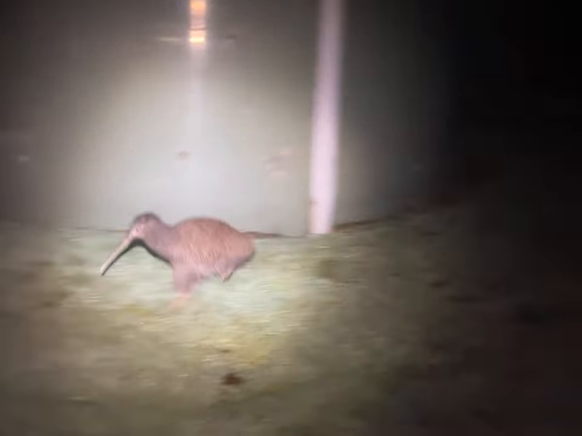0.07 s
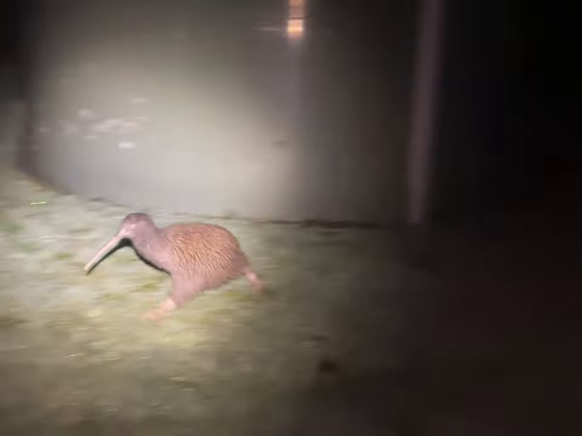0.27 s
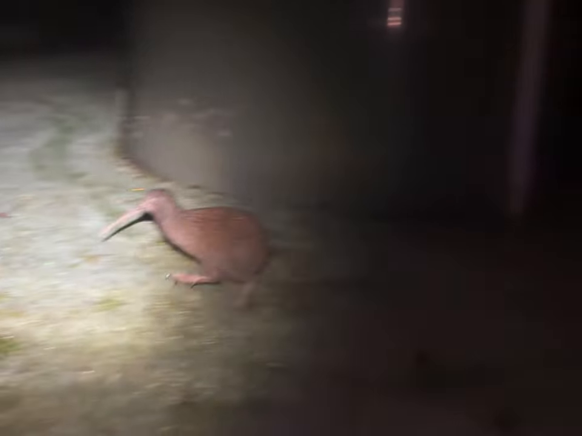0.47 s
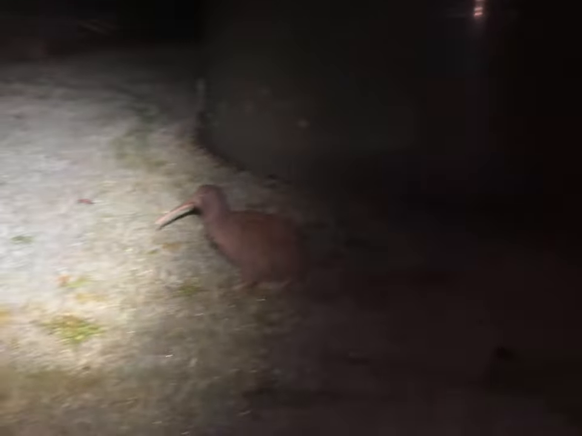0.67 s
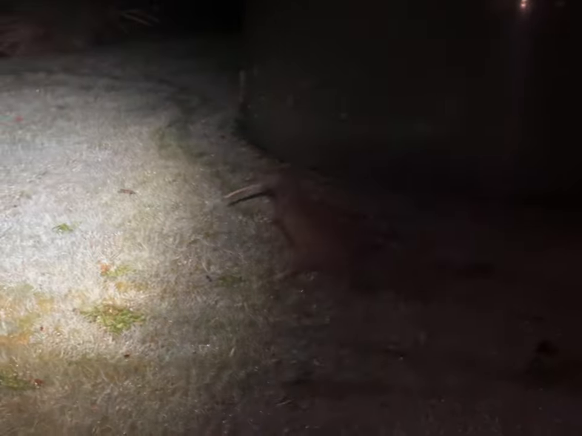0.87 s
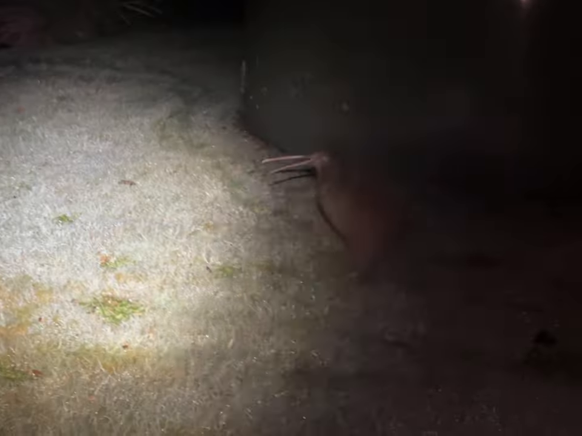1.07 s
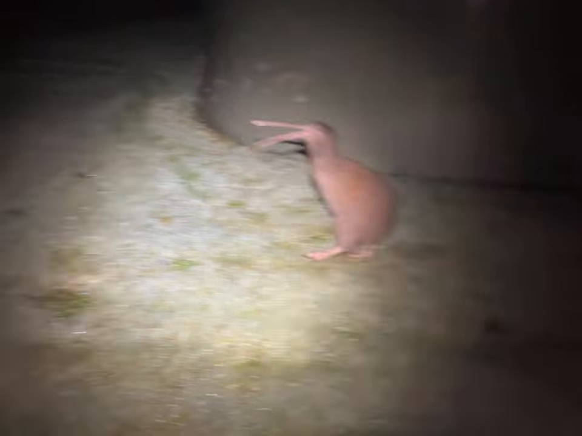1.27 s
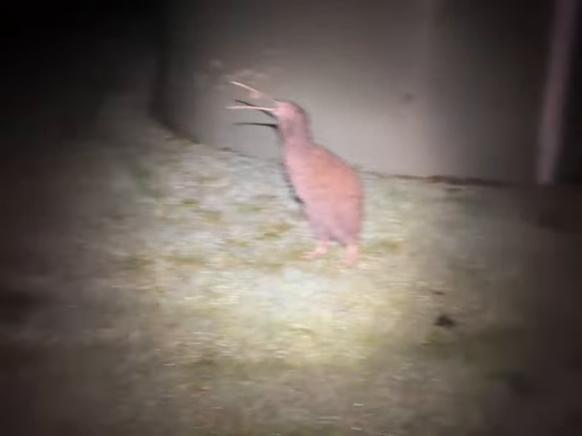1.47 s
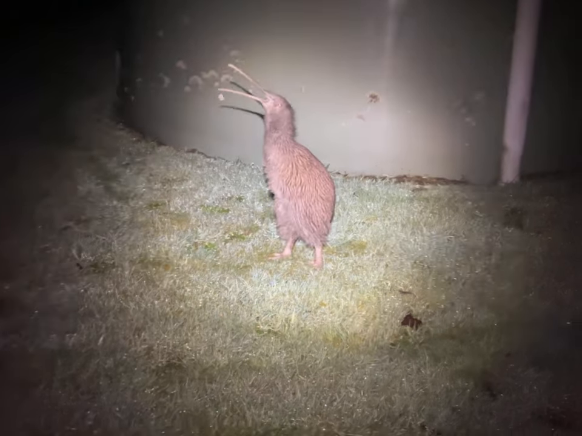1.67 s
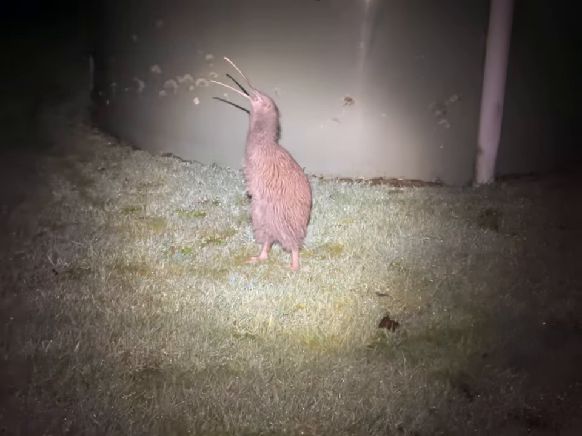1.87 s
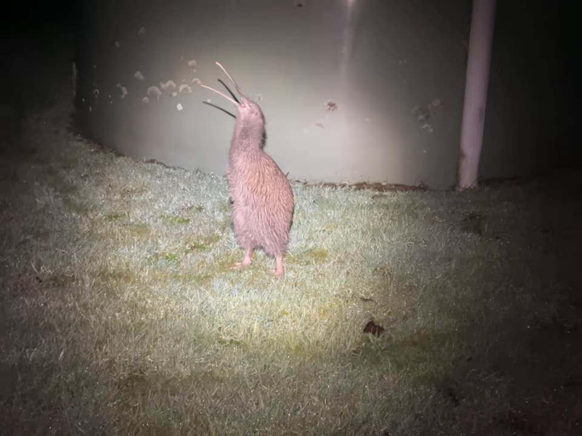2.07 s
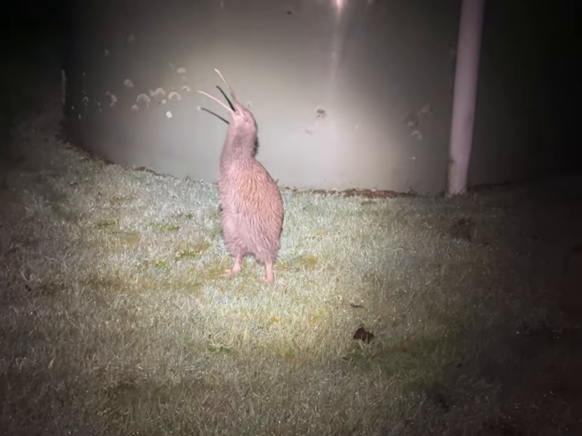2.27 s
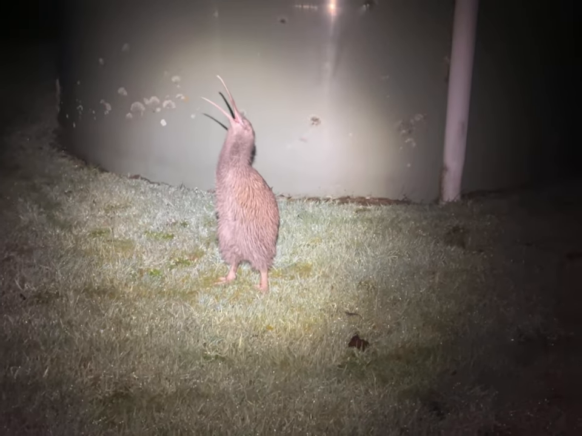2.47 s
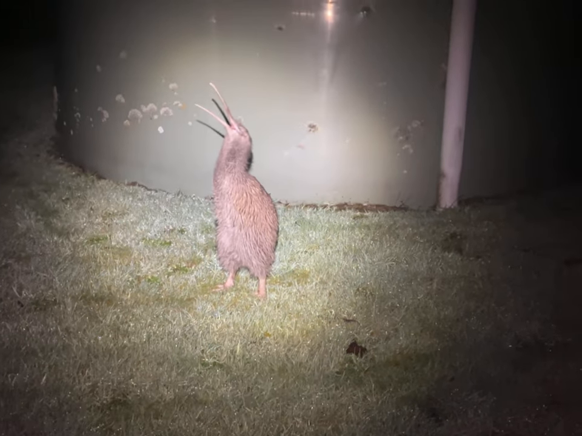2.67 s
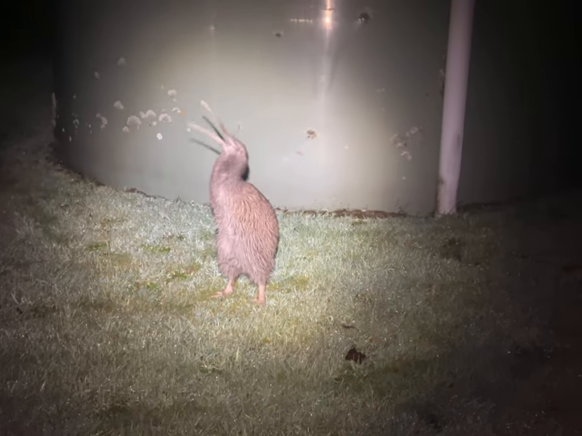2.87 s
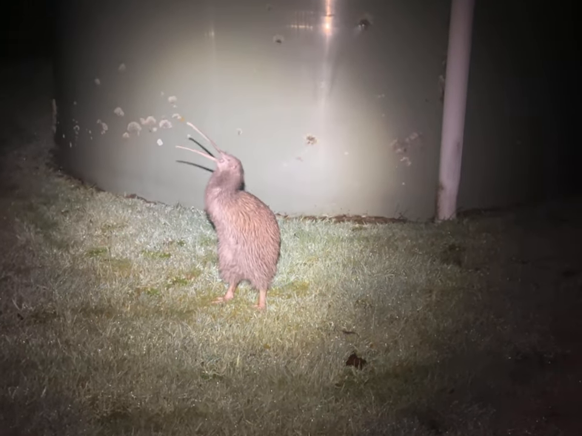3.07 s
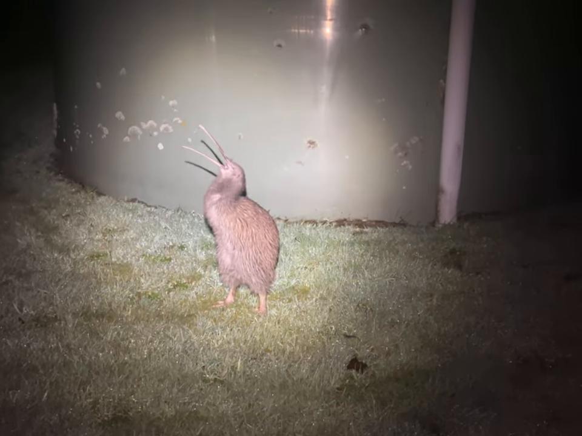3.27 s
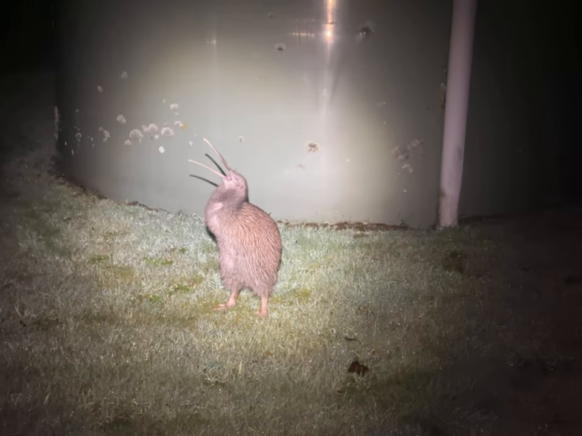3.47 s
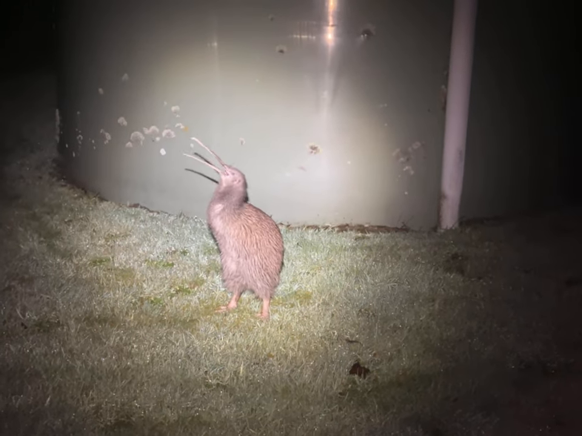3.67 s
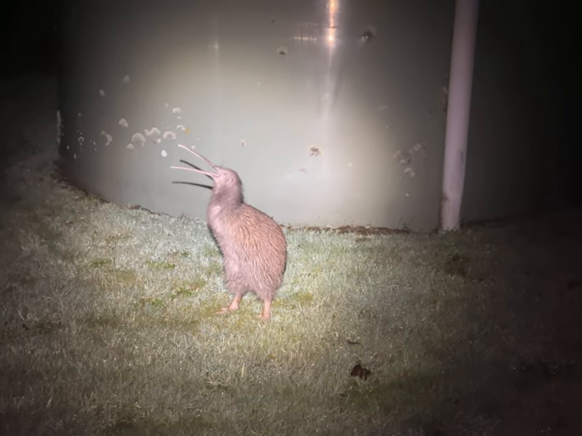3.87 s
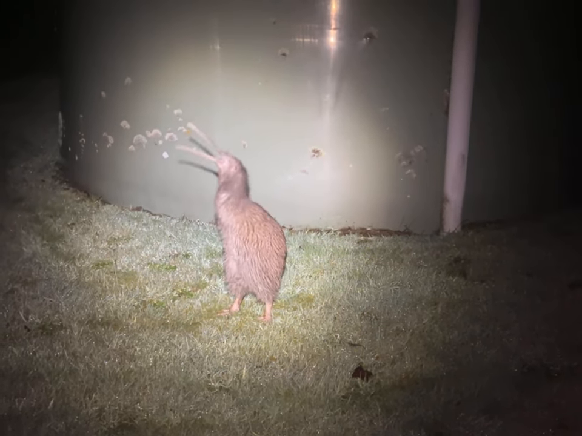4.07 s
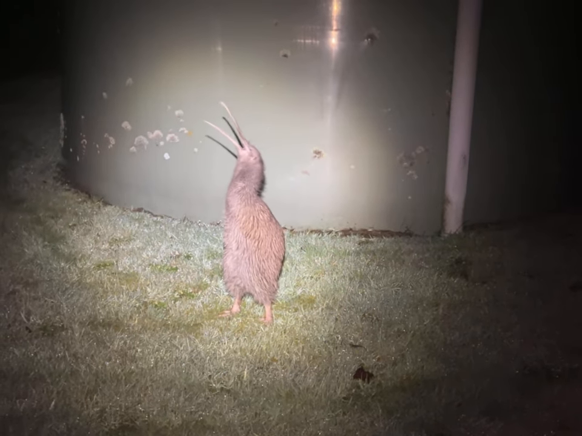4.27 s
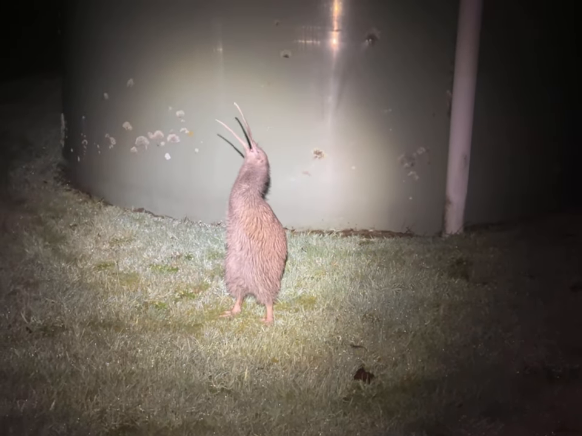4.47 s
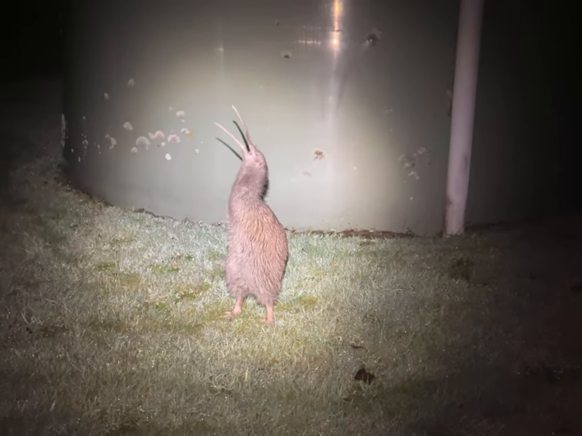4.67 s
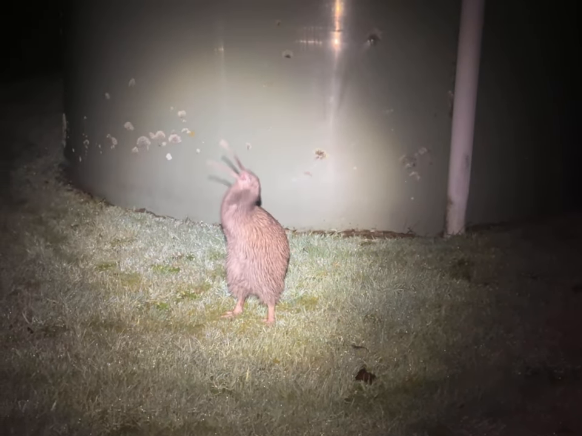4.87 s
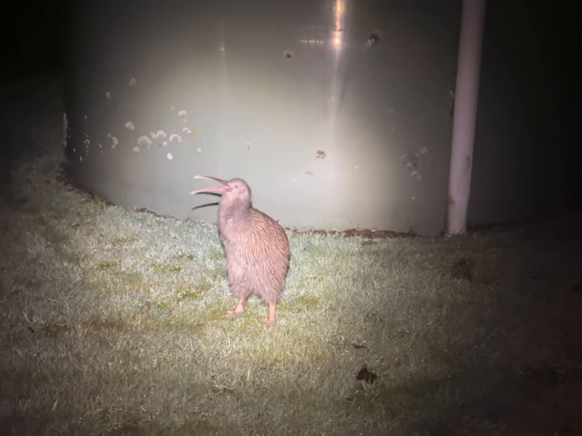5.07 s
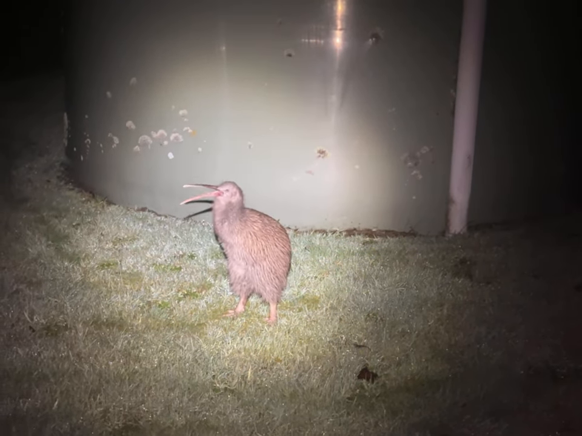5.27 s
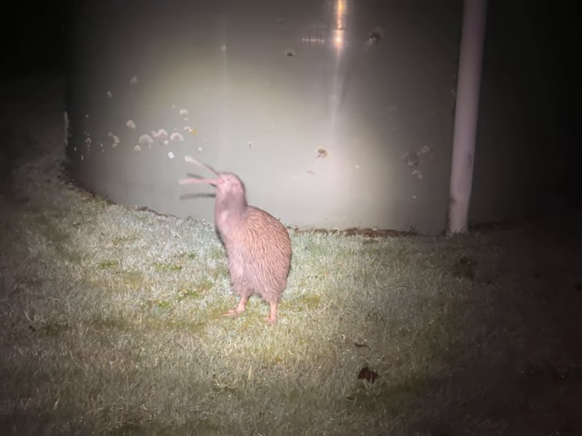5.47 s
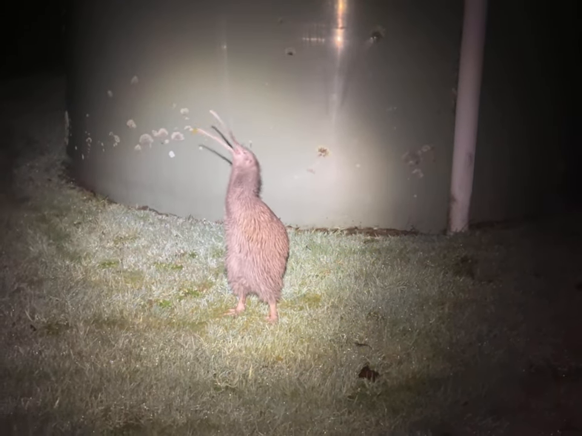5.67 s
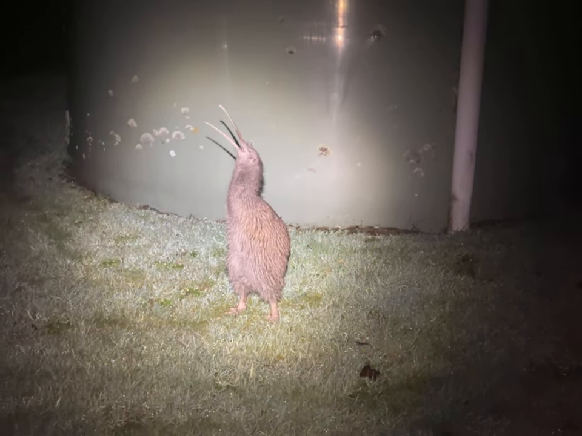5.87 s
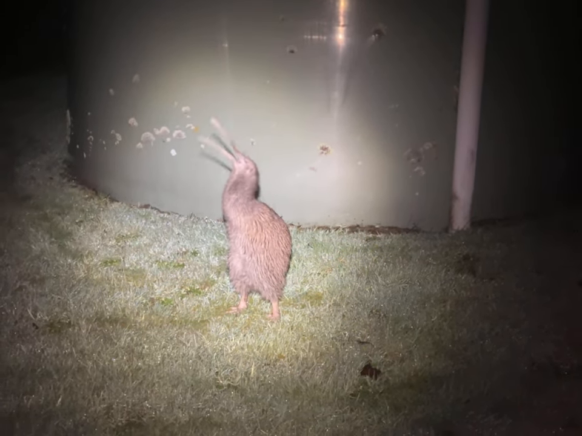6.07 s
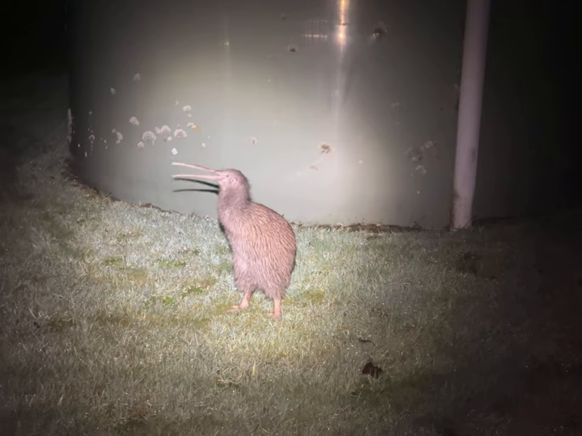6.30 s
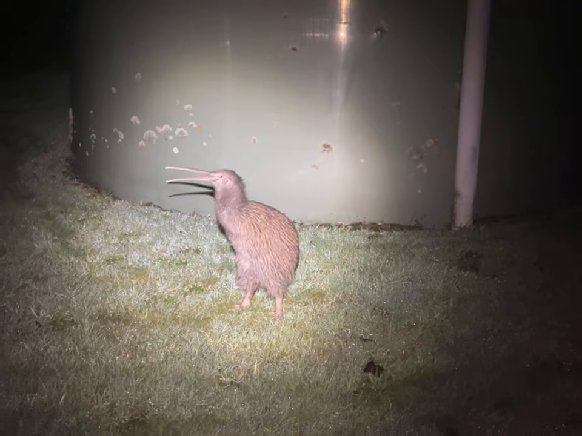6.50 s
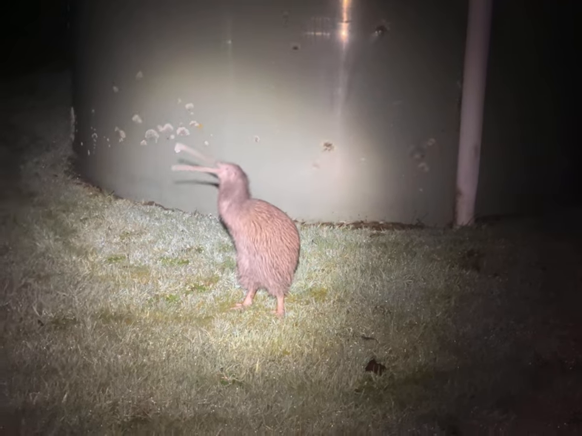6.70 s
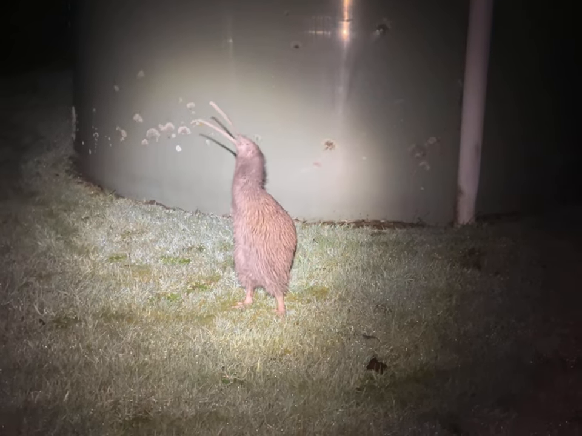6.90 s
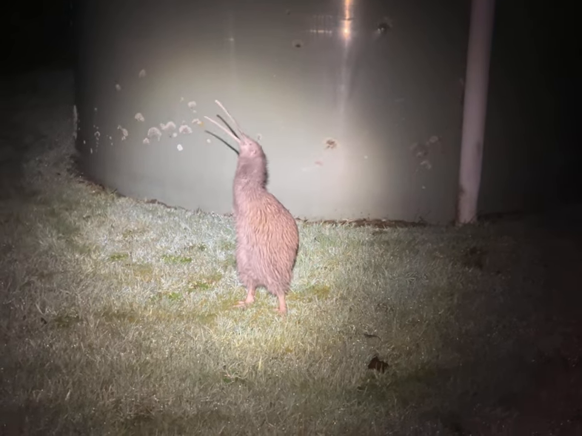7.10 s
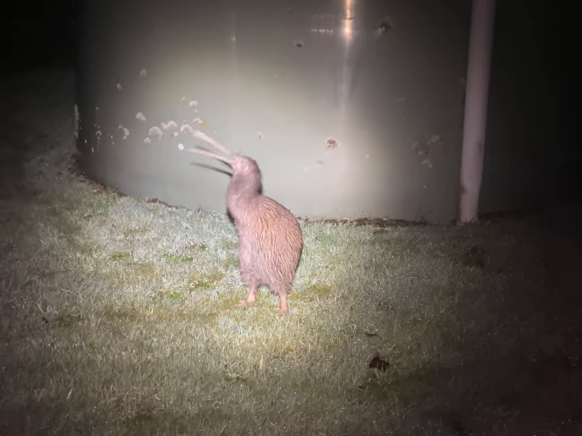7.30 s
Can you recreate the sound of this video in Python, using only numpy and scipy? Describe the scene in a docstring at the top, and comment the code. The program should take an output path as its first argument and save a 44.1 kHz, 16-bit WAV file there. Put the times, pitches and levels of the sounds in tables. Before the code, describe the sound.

Outdoors at night, very faint grass crackles and tiny thuds mark a kiwi's steps. After a second it gives a long hoarse cry, partly whistled, then three shorter and rougher ones separated by brief pauses. The bird is fairly close to the microphone; a nearby tank wall and the ground reflect it slightly, with a weak tail from the garden over soft night air.

```python
"""A garden lawn at night: a kiwi takes a few steps, then gives four long, harsh cries.
Its syrinx rattles irregularly into a neck that is tight as a cry opens, slack while held and tight at its end;
tension sets the resonances, the rate of the rattle and the balance of the paths; the later cries fade faster.
Air hisses in the bill, grass crackles under the feet, and coloured noise makes the still night air.
The ground and a tank wall reflect the cries, and the quiet garden answers faintly."""
import sys
import numpy as np
from scipy import signal
from scipy.fft import rfft, irfft, next_fast_len
from scipy.io import wavfile
from scipy.ndimage import uniform_filter1d, map_coordinates

SR = 44100
rng = np.random.default_rng(int(sys.argv[2]) if len(sys.argv) > 2 else 0)


def put_to_file(sound):
    """Save the sound as 16-bit audio at rate SR, in the file named by the first command-line argument."""
    columns = np.atleast_2d(sound).T  # one column per channel
    safe = np.clip(columns, -1, 1)
    whole_steps = np.round(safe * 32767)
    wavfile.write(sys.argv[1], SR, whole_steps.astype(np.int16))


N = 323694


def amp(db):
    """Level to amplitude: 20 dB is a factor of ten."""
    return 10 ** (np.asarray(db) / 20)


def unit(x):
    """Normalise the mean power to 1."""
    return x / np.sqrt(np.mean(x ** 2) + 1e-20)


def even(x):
    """Divide by the short-time rms: the slow level is held at 1 and the fast flutter stays."""
    size = SR // 32
    power = uniform_filter1d(uniform_filter1d(x ** 2, size), size)
    return x / np.sqrt(np.abs(power) + 1e-12)


def along(points, hz):
    """Interpolate (f/Hz, value) points on a logarithmic frequency axis."""
    f, v = np.transpose(points)
    return np.interp(np.log(hz + 1), np.log(f + 1), v)


def clock():
    """Time of each sample in seconds."""
    return np.arange(N) / SR


def wobble(rate):
    """Smooth random modulation: a spline through random knots, rate of them a second."""
    return map_coordinates(rng.standard_normal(int(N * rate / SR) + 4), [clock() * rate])


def swell(s, length):
    """Gaussian envelope around time s, with length as its standard deviation."""
    return np.exp(-.5 * ((clock() - s) / length) ** 2)


def step(t, seconds):
    """Sigmoid transition from 0 to 1 as t passes zero."""
    return .5 + .5 * np.tanh(t / (2 * seconds))


def filtered(x, response):
    """Linear filtering: the spectrum times a fixed response of frequency."""
    m = next_fast_len(N + SR // 4)
    return irfft(rfft(x, m) * response(np.fft.rfftfreq(m, 1 / SR)), m)[:N]


def coloured(x, spectrum):
    """Spectral shaping of x by (f/Hz, level/dB) points, at rms 1."""
    return unit(filtered(x, lambda hz: amp(along(spectrum, hz))))


def resonance(hz, centre, width):
    """Damped resonator: a causal band-pass response of peak 1."""
    return 1j * hz * width / (centre ** 2 - hz ** 2 + 1j * hz * width)


def delayed(x, seconds):
    """Propagation delay: x arrives later."""
    return np.interp(clock() - seconds, clock(), x, left=0)


def kiwi(waver=0.029, tone_db=0, fundamental_db=1, pinch_db=-10, unsteady_db=0.76):
    """Source and filter: a regular syrinx whistles its third harmonic in the throat; a rough one rasps."""
    # response of each path (throat, rasp, growl, sizzle, flare) to neck and lungs:
    # gain at full tension/dB, exponent of tension, share of the fade, attack/s, release/s
    path_responses = [ (11.5, 0.64, 0.62, 0.031, 0.033), (-8, 1.3, 1, 0.086, 0.055),
                      (2, 1.1, .2, 0.017, 0.0071), (-3.5, 1.5, .88, .05, 0.058), (13, 0.55, 1, 0.034, .045),
                      ]
    # when the long cry breaks into a faster rattle: start t/s, end t/s
    break_span = (2.93, 3.7)
    lock_ratio = 3.07  # throat resonance over the rate of slaps
    break_ratio, break_rasp_db, break_s = 1.5, -4, .03  # rate factor, rasp change at tension 1, transition
    grunt_db, grunt_s = 7.5, .04  # the growl swells as the air runs out
    dull_start_db, dull_s, dull_per_fade = 7.5, 0.23, 0.18  # weak pressure dulls the rasp; dB per dB of fade

    t = clock()
    age, length, throat_db, rasp_db, growl_db, sizzle_db, flare_db, fade, rough, *posture = cry_now()
    left = length - age
    tension, throat_hz, notch_hz = neck(age, left, *posture)
    rough, whistle_db, burst_db = surges(rough)
    break_start, break_end = break_span
    broken = step(t - break_start, break_s) * (t < break_end)
    pitch = throat_hz / lock_ratio * break_ratio ** broken
    tight = np.minimum(tension, 1)  # beyond 1 the balance of the paths no longer shifts
    dull_db = dull_start_db * np.exp(-np.abs(age) / dull_s) + dull_per_fade * fade * age

    flow = syrinx(pitch, rough)
    throat, rasp, growl, sizzle, flare = tract(flow, rough, throat_hz, notch_hz, dull_db)

    # the regular part of the voice: a fundamental and its third harmonic
    wavering_pitch = pitch * (1 + waver * (0.671 + rough) * wobble(170))
    phase = 2 * np.pi * np.cumsum(wavering_pitch) / SR
    clean = np.sqrt(2 * np.clip(1 - rough / 0.63, 0, 1)) * amp(1.8 * wobble(90))
    whistle = amp(tone_db) * clean * np.sin(3 * phase)
    fundamental = amp(fundamental_db + pinch_db * tight + 2.0 * wobble(60)) * clean * np.sin(phase)
    throat = saturated(np.sqrt(rough) * throat + whistle, rough)
    rasp = saturated(rasp, rough)
    growl = even(growl + fundamental)

    layers = throat, rasp, growl, sizzle, flare
    levels = (
        throat_db + whistle_db,
        rasp_db + burst_db + break_rasp_db * broken * tension,
        growl_db + grunt_db * np.exp(-np.abs(left) / grunt_s),
        sizzle_db + burst_db,
        flare_db + burst_db,
    )
    out = np.zeros(N)
    for layer, db, (tight_db, exponent, share, attack, release) in zip(layers, levels, path_responses):
        gate = np.clip(np.minimum(age / attack, left / release), 0, 1)
        out += layer * gate * amp(db + tight_db * tight ** exponent - share * fade * age)
    out = out * amp(unsteady_db * wobble(22))
    # so small a body radiates no bass
    return signal.sosfilt(signal.butter(2, 170, "high", fs=SR, output="sos"), out)


def cry_now():
    """Piecewise-constant control: each sample takes the time since its cry began and that cry's settings."""
    # the four cries: t/s, length/s, base levels of throat, rasp, growl, sizzle and flare/dB,
    # fade/(dB/s), base roughness 0-1, base slack resonance f/Hz, opening resonance f/Hz, opening tension,
    # opening peak after t/s, opening width/s, closed for the last/s, squeezed for the last/s
    cry_rows = [ (1.092, 2.484, -32.5, -20.5, -48.5, -49.5, -87, 1.26, .62, 1174, 1309, 0.8, .06, .165, 0.69, 0.21),
                (3.89, 1.084, -30.5, -21, -46, -51, -75.5, 0, 0.82, 1155, 1512, 1.38, 0.11, .072, 0.12, .04),
                (5.32, .843, -28, -17, -42.5, -47.5, -61.5, 15, 0.95, 1071, 1502, 1.17, .105, .1, .055, .01),
                (6.571, .763, -27, -18, -42.5, -49.5, -74, 26, .98, 999.6, 1454, 1.035, .1, .115, .022, .002),
                ]
    rows = np.array(cry_rows)
    # one cry hands over to the next halfway through the pause
    changeovers = (rows[:-1, 0] + rows[:-1, 1] + rows[1:, 0]) / 2
    start, *columns = rows[np.searchsorted(changeovers, clock())].T
    return clock() - start, *columns


def neck(age, left, slack_hz, open_hz, open_tension, peak_s, width_s, closed_s, squeezed_s):
    """Tension tunes a tube: the throat resonance and the antiresonance rise with that of the neck."""
    opening_shape, throat_follows = 1.4, .75  # exponents: peak of tension, resonance against it
    close_s, closed_tension, closed_hz = .026, 1.02, 1474.8  # closing transition; state it moves towards
    lead_share, lead_ratio, lead_s = .25, .3, .065  # part of the closing that creeps in early
    squeeze_tension, squeeze_hz, squeeze_s = 0.55, 110, .04  # the last squeeze adds to both
    sag_hz_per_s = 85  # the slack resonance sinks while the cry is held
    scoop_hz, scoop_s = 130.4, .03  # each cry starts a little flat
    notch_ratio, notch_rise_hz = 1.214, 1334  # antiresonance over slack resonance; rise per unit of tension

    opening = np.exp(-np.abs((age - peak_s) / width_s) ** opening_shape)
    creep = np.exp(-np.maximum(left - closed_s, 0) / (lead_ratio * closed_s + lead_s))
    closing = lead_share * creep + (1 - lead_share) * step(closed_s - left, close_s)
    squeeze = step(squeezed_s - left, squeeze_s)
    tension = open_tension * opening + closed_tension * closing + squeeze_tension * squeeze

    slack_hz = slack_hz - sag_hz_per_s * age
    opening_rise = (open_hz - slack_hz) * opening ** throat_follows
    closing_rise = (closed_hz - slack_hz) * closing ** throat_follows
    scoop = scoop_hz * np.exp(-np.abs(age) / scoop_s)
    throat_hz = slack_hz + opening_rise + closing_rise + squeeze_hz * squeeze - scoop
    return tension, throat_hz, notch_ratio * slack_hz + notch_rise_hz * tension


def surges(rough):
    """Change of regime: at times the syrinx blows harder or locks into a regular whistle."""
    # centre t/s, length (standard deviation)/s, roughness 0-1, throat level/dB, level of the treble paths/dB
    surge_rows = [(1.108, .045, 0.13, -1, -3.5), (1.552, 0.25, 0.27, 7, 0), (1.98, 0.079, 0.24, 5.5, 0),
                  (2.83, 0.029, 0.5, 5.5, 0), (4.626, 0.0098, 0.91, 0.5, 4), (4.858, .009, .15, 12.5, 3.5),
                  (4.885, 0.0042, .9, -3, 8), (4.895, 0.0068, 0.58, 7.5, 1.5)]
    throat_db = treble_db = 0
    for s, length, surge_rough, throat_gain, treble_gain in surge_rows:
        surge = swell(s, length)
        rough = rough + surge * (surge_rough - rough)
        throat_db = throat_db + throat_gain * surge
        treble_db = treble_db + treble_gain * surge
    return np.clip(rough, .02, 1), throat_db, treble_db


def syrinx(pitch, rough, jitter=.33, scatter_db=3, air=1.31, flutter_db=2.0):
    """Pulsed excitation: uneven slaps of the membranes, each with a decaying puff of turbulent air."""
    cycles = np.cumsum(pitch * np.exp(jitter * np.sqrt(rough) * wobble(300))) / SR
    at = np.flatnonzero(np.diff(np.floor(cycles)))
    slaps = np.zeros(N)
    slaps[at] = amp(scatter_db * rough[at] * np.clip(rng.standard_normal(N)[:len(at)], -2, 2))
    puff_s = 0.0046  # decay time of the puff
    puff = signal.lfilter([1], [1, -np.exp(-1 / (puff_s * SR))], slaps)
    flow = unit(slaps) + air * unit(puff * rng.standard_normal(N))
    # the rougher the voice, the more the whole flow stutters
    flow = flow * amp(flutter_db * rough ** 3 * np.clip(wobble(330), -2, 2))
    # the lungs supply air evenly: a strong slap is followed by weaker ones
    supply = uniform_filter1d(flow ** 2, size=SR // 90)
    return flow / (np.abs(supply) + 1e-6) ** 0.074


def tract(flow, rough, throat_hz, notch_hz, dull_db, sac_width_hz=55, sac_db=10.0):
    """Time-varying filtering of the flow along five paths: throat, rasp, growl, sizzle and bright flare."""
    # colour of the low growl: f/Hz, level/dB
    growl_colour = [(100, -33.5), (260, -12.5), (340, -15), (420, -10), (540, 3), (750, 8), (1000, 3.5),
                    (1400, -22), (2200, -50)]
    # colour of the sizzle: f/Hz, level/dB
    sizzle_colour = [(4000, -40), (6500, -19), (7400, 1), (8500, 1), (9300, -6), (10400, 3.5), (11300, 3),
                     (12500, -1.5), (13700, 5), (15700, -7)]
    # bright resonance that rises as the neck tightens: slack f/Hz, tight f/Hz, width of each of two stages/Hz
    flare_range = (6100, 8700, 1500)
    rasp_lag = 0.37  # the upper resonances move little until the neck is fairly tight
    dull_hz, dull_edge_hz = 4700, 400  # dulling acts above this frequency

    hz, t, z = signal.stft(flow, SR, nperseg=1024, noverlap=768)
    hz = hz[:, None]
    controls = rough, throat_hz, notch_hz, dull_db
    rough, throat_hz, notch_hz, dull_db = (np.interp(t, clock(), control) for control in controls)
    tight = np.clip((notch_hz - 1350) / 1350, -.1, 1.35)

    throat = throat_pair(hz, throat_hz, tight, rough)
    dulling = amp(-dull_db * step(hz - dull_hz, dull_edge_hz))
    rasp = upper_modes(hz, tight * np.abs(tight) ** rasp_lag, rough) * dulling
    # an air sac adds a low resonance to the growl, lost when the voice breaks up fully
    sac = amp(sac_db) * np.sqrt(np.clip(1 - rough ** 6, 0, 1))
    growl = amp(along(growl_colour, hz)) + sac * np.abs(resonance(hz, 372 + 55 * tight, sac_width_hz)) ** 2
    sizzle = amp(along(sizzle_colour, hz)) * np.exp(2j * np.angle(resonance(hz, 9480, 1500)))
    sizzle = sizzle * (hz / 10400) ** (0.42 * rough ** 4)  # turbulence tilts it upward
    low, high, width = flare_range
    flare = resonance(hz, low + tight * (high - low), width) ** 2

    z = z * hollows(hz, notch_hz, tight, rough)
    paths = throat, rasp, growl, sizzle, flare
    return [even(signal.istft(z * path, nperseg=1024, noverlap=768)[1][:N]) for path in paths]


def throat_pair(hz, throat_hz, tight, rough, slack_width_hz=170, tight_width_hz=240, split=0.074, leak=0.21):
    """Two close resonances part as the throat tightens; a slack, rough voice spills around them."""
    width = slack_width_hz + tight * (tight_width_hz - slack_width_hz)
    apart = 0.995 + split * tight
    pair = -resonance(hz, throat_hz / apart, width) * resonance(hz, throat_hz * apart, width)
    spill = leak * rough ** 2 * np.clip(1 - tight, 0, 1) ** 2
    skirt = spill * np.abs(resonance(hz, throat_hz * 1.61, 1100)) ** 2
    low_slope = np.minimum(hz / throat_hz, 1)
    return (np.abs(pair) + skirt) * low_slope * np.exp(1j * np.angle(pair))


def upper_modes(hz, tight, rough, focus=0.52):
    """Modal ringing: the rasp's resonances smear the slaps; a smooth voice keeps to the strongest."""
    # upper resonances: slack f/Hz, tight f/Hz, width/Hz, relative level/dB
    mode_rows = [(1956, 2000, 73, -4.5), (2525, 3360, 266, -3.5), (2962, 3700, 380, 2),
                 (3454, 4340, 690, -6), (3950, 5350, 670, -8.5)]
    # radiation of the open bill: f/Hz, level/dB
    bill_radiation = [(800, -31), (1500, 0.5), (2100, 1), (3500, 0.5), (5200, 0), (6300, -3.5), (7500, -14),
                      (9000, -27), (15000, -52)]
    modes = np.array([
        amp(db) * resonance(hz, low + tight * (high - low), width)
        for low, high, width, db in mode_rows
    ])
    smear = np.exp(2j * np.angle(modes[1:4]).sum(axis=0))
    focused = np.abs(resonance(hz, 2750 + 850 * tight, 966)) ** (focus * (1 - rough))
    return np.linalg.norm(modes, axis=0) * smear * focused * amp(along(bill_radiation, hz))


def hollows(hz, notch_hz, tight, rough, notch_width_hz=190, notch_db=-15, blur=0.78):
    """Antiresonance: a side cavity cancels bands that rise with tension; turbulence fills the lowest."""
    # higher antiresonances of the neck: slack f/Hz, tight f/Hz, width/Hz, level/dB
    hollow_rows = [(4000, 6650, 260, -9), (6100, 9400, 350, -9), (8000, 11300, 330, -6),
                   (9000, 12200, 330, -5), (11100, 13300, 420, -8), (12700, 15500, 350, -4)]
    filled = np.clip(blur * rough * (1 - tight), 0, 1)
    total_db = notch_db * (1 - filled) * np.exp(-((hz - notch_hz) / notch_width_hz) ** 2)
    for low, high, width, db in hollow_rows:
        total_db = total_db + db * np.exp(-((hz - low - tight * (high - low)) / width) ** 2)
    return amp(total_db)


def saturated(x, rough, hold=0.13):
    """Amplitude limiting: a regular oscillation limits its own size; a rough one flutters freely."""
    power = np.abs(uniform_filter1d(x ** 2, size=SR // 250)) + 0.045
    return even(x / power ** np.clip(hold * (1 - rough ** 2), 0, .5))


def hisses(width_hz=1700):
    """Turbulent jet noise: air hisses thinly through the narrow bill, as band-passed noise."""
    # at the start of a cry and between cries: centre t/s, length (standard deviation)/s, f/Hz, level/dB
    hiss_rows = [(1.203, 0.045, 10600, -46.5), (3.674, 0.062, 11040, -73), (3.999, .03, 10700, -57),
                 (5.1, 0.034, 11910, -75), (5.41, 0.043, 13500, -54), (6.299, 0.07, 12230, -86.5),
                 (6.642, .025, 10910, -52)]
    air = rng.standard_normal(N)
    out = np.zeros(N)
    for s, length, centre, db in hiss_rows:
        hiss = unit(filtered(air, lambda hz: resonance(hz, centre, width_hz) ** 2))
        out += amp(db) * swell(s, length) * hiss
    return out


def steps(crackle_db=4):
    """Friction, then impact: grass blades crackle as modulated noise, then the foot lands with a low thud."""
    # steps in the grass: swish centre t/s, swish length (standard deviation)/s, swish level/dB, thud level/dB
    step_rows = [(0.106, 0.022, -72, -65), (0.325, 0.015, -65.5, -61), (0.603, 0.042, -71.5, -70),
                 (0.924, 0.032, -76.5, -78)]
    # colour of the grass: f/Hz, level/dB
    grass_colour = [(410, -31), (700, -3), (955, -32), (1190, -12), (1540, -7), (1870, -18), (2560, -12),
                    (15500, -18.5)]
    thud_colour = [(30, -27), (80, 20.5), (160, -17), (400, -14), (2000, -50)]  # f/Hz, level/dB
    swish = coloured(rng.standard_normal(N) * amp(crackle_db * wobble(280)), grass_colour)
    thud = coloured(rng.standard_normal(N), thud_colour)
    out = np.zeros(N)
    for s, length, db, thud_db in step_rows:
        out += amp(db) * swell(s, length) * swish
        out += amp(thud_db) * swell(s + 0.0074, 0.011) * thud
    return out


def garden(x, ground=0.068, wall_db=-17, far_db=-31, tail_db=-29):
    """Reflection and scattering: ground bounce, tank wall, a far echo and a faint tail from the trees."""
    # decay of the tail: f/Hz, t60/s
    decay_times = [(200, 0.24), (1300, 0.77), (3000, 0.74), (6000, 0.41), (12000, 0.17)]
    dull = [(300, 2.5), (1400, -4), (3000, -5), (6000, -5.0), (12000, -25.5)]  # f/Hz, level/dB
    hz, t, z = signal.stft(rng.standard_normal(SR), SR, nperseg=256)
    hz = hz[:, None]
    tail_shape = amp(along(dull, hz) - 60 * t / along(decay_times, hz))
    tail = signal.istft(z * tail_shape, SR, nperseg=256)[1]
    trees = amp(tail_db) * signal.fftconvolve(x, tail / np.linalg.norm(tail))[:N]
    trees = trees * amp(1.5 * wobble(25))  # echoes from separate trees arrive in clumps
    far = filtered(delayed(x, 0.071), lambda hz: amp(far_db + along(dull, hz)))
    bounce = ground * delayed(x, 0.002057)
    wall = amp(wall_db) * delayed(x, 0.015)
    return x + bounce + wall + far + trees


def night_air():
    """Broadband ambient noise: still night air, strongest in the bass, its level drifting slightly."""
    # colour of the night: f/Hz, level/dB
    night_colour = [(25, -37.5), (45, -24), (70, 1), (100, -1.5), (200, -4), (400, -10), (700, -7.5),
                    (1200, -16), (2000, -20), (4000, -22.5), (6000, -31.5), (9000, -34.5), (15000, -42.5)]
    return amp(-68.5 + 0.8 * wobble(4.6)) * coloured(rng.standard_normal(N), night_colour)


def scene():
    """Superposition: the bird in the garden over the still night air."""
    return (garden(kiwi()) + hisses() + steps() + night_air())[None]


def record(dry):
    """Band limitation: nothing passes at or above the top frequency."""
    top_hz = 15750
    return filtered(dry[0], lambda hz: hz < top_hz)[None]


dry = scene()
out = record(dry)
put_to_file(out)
```